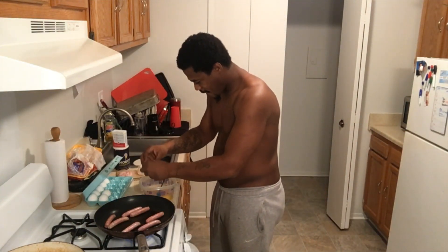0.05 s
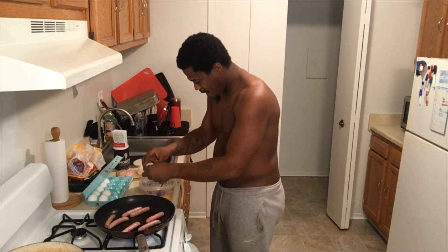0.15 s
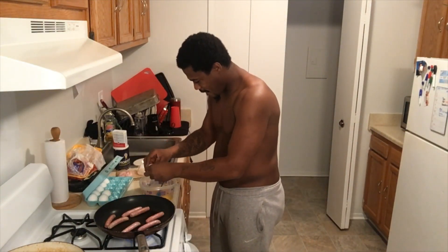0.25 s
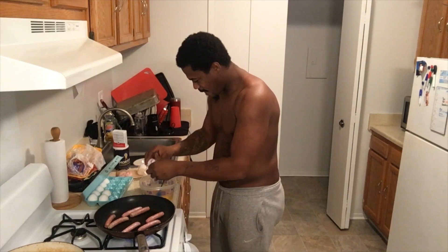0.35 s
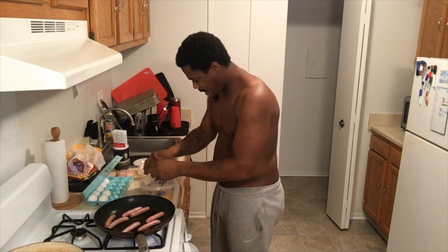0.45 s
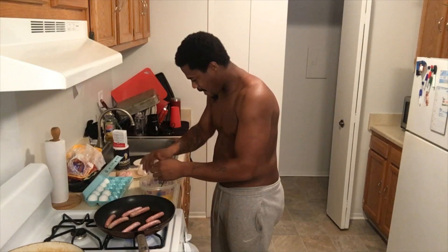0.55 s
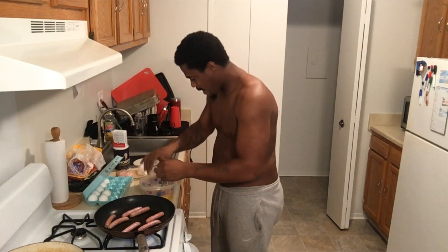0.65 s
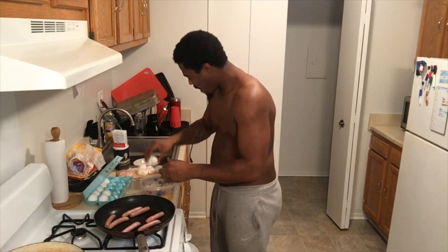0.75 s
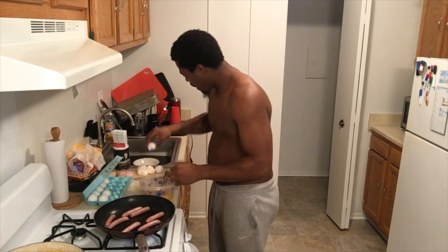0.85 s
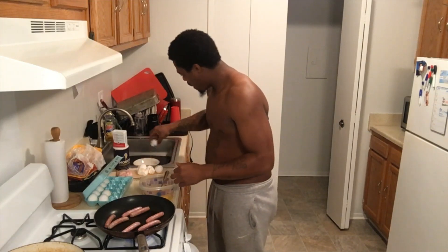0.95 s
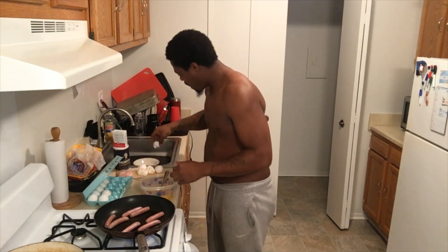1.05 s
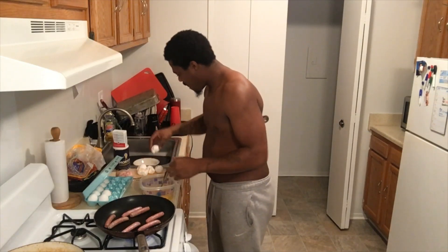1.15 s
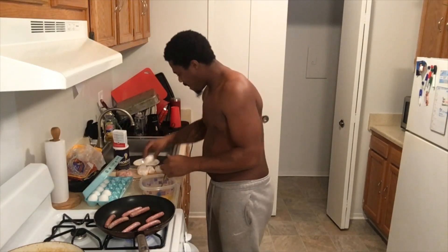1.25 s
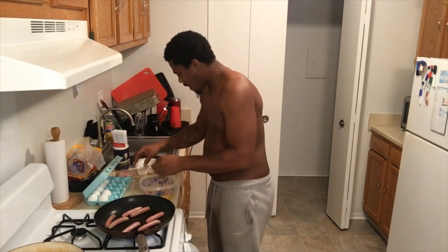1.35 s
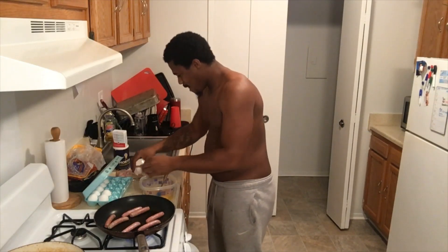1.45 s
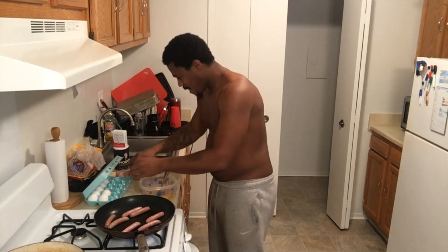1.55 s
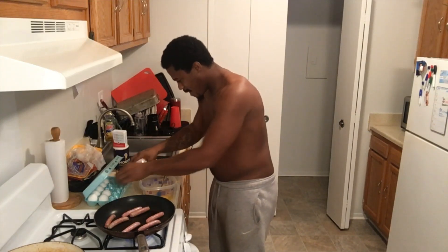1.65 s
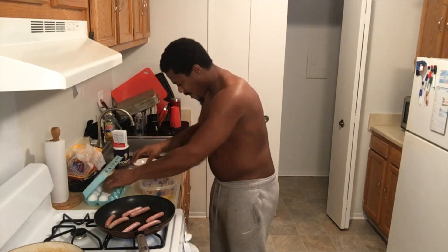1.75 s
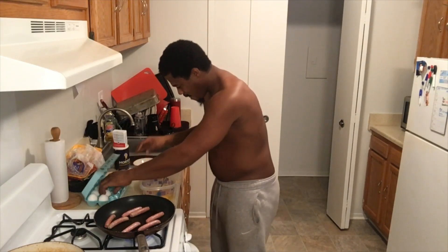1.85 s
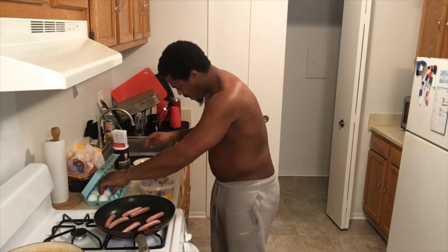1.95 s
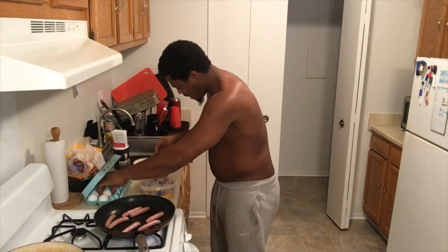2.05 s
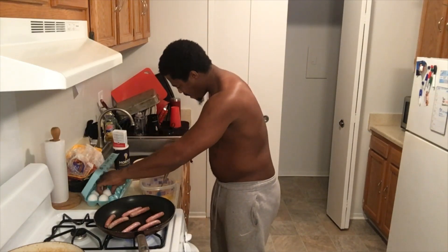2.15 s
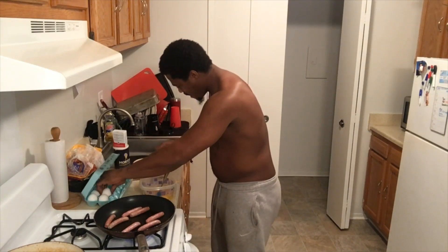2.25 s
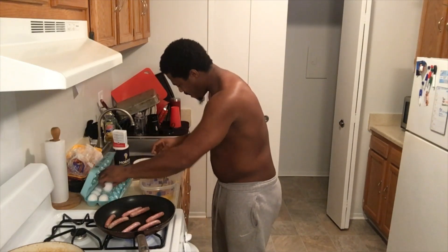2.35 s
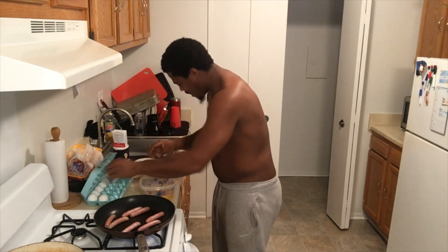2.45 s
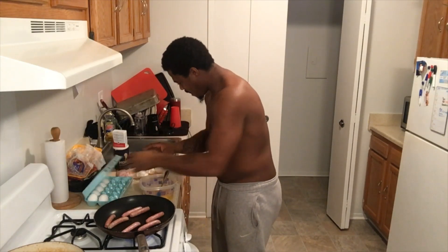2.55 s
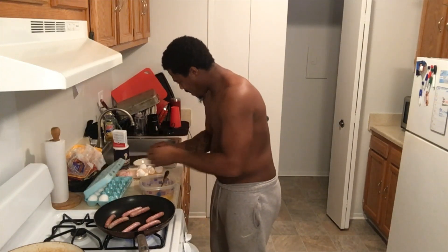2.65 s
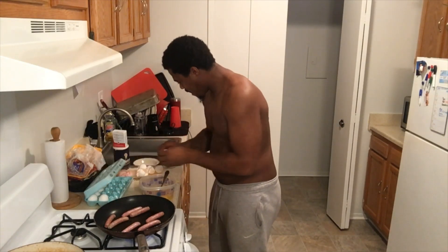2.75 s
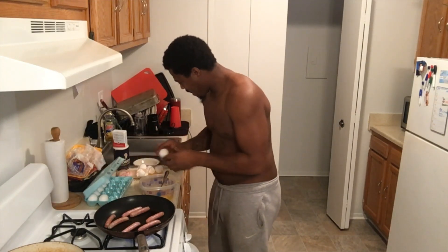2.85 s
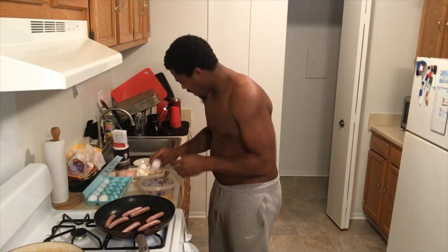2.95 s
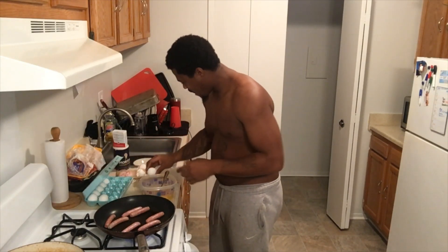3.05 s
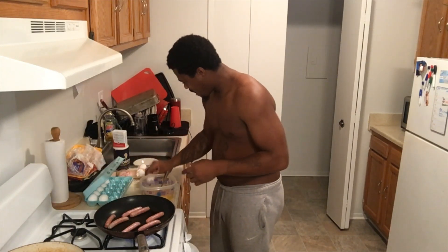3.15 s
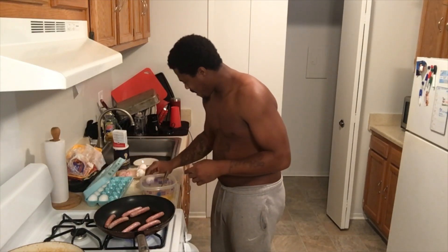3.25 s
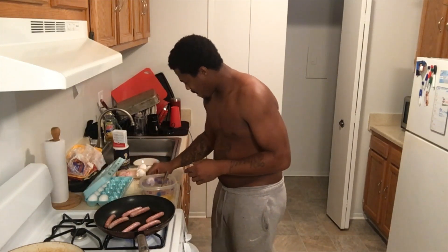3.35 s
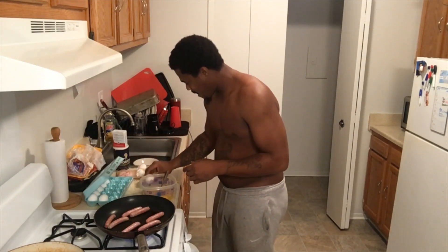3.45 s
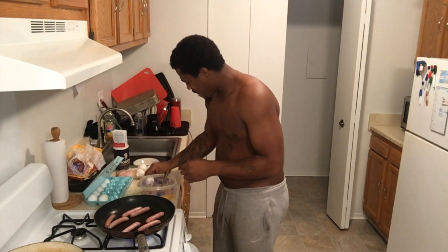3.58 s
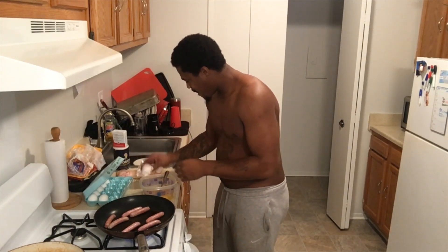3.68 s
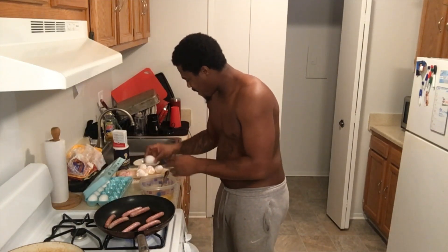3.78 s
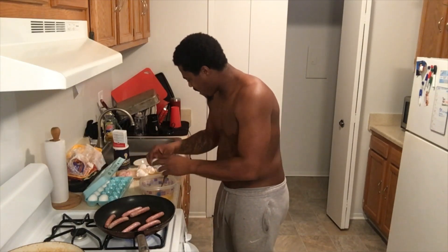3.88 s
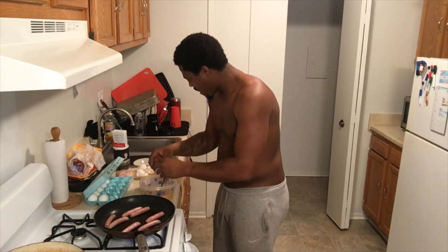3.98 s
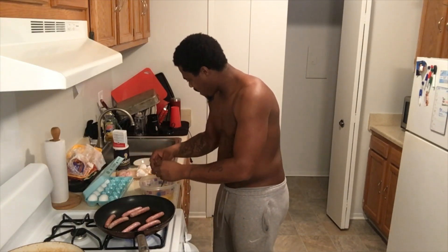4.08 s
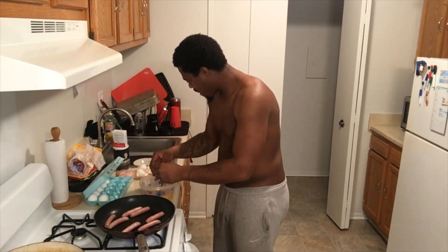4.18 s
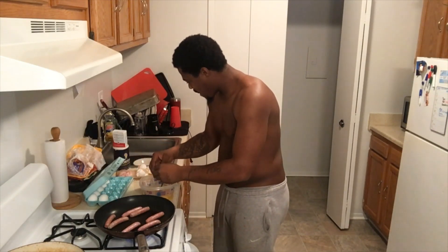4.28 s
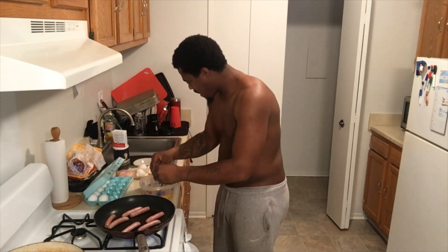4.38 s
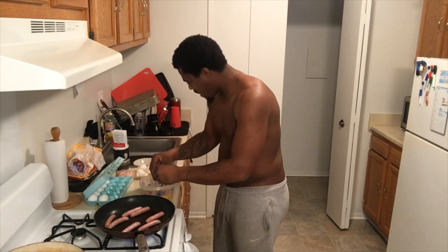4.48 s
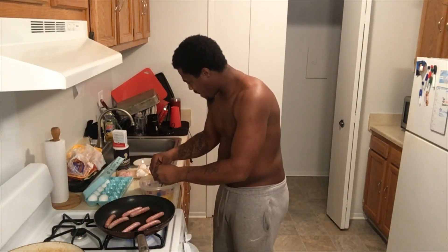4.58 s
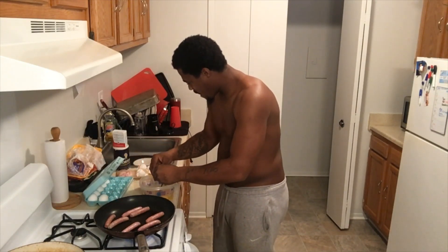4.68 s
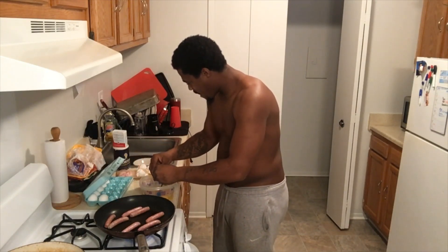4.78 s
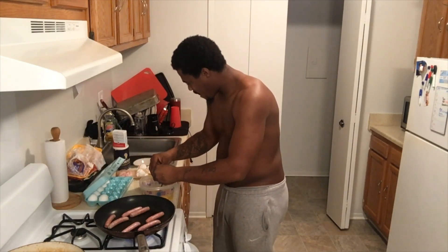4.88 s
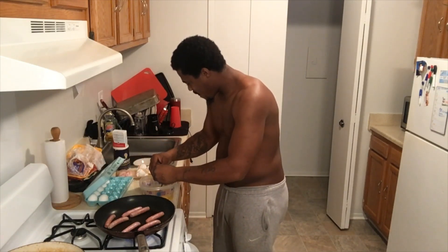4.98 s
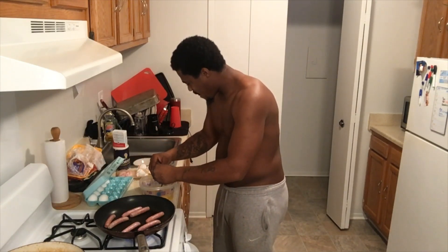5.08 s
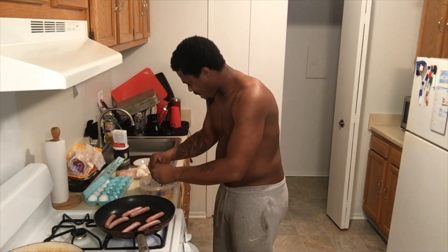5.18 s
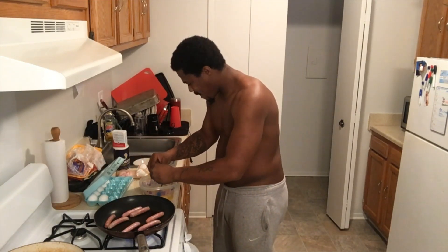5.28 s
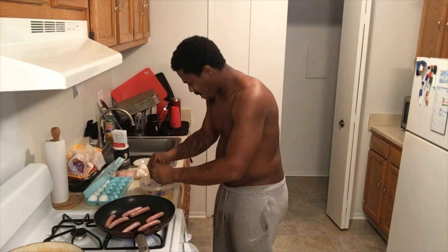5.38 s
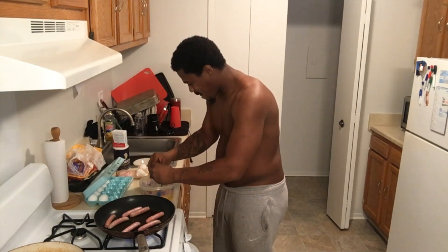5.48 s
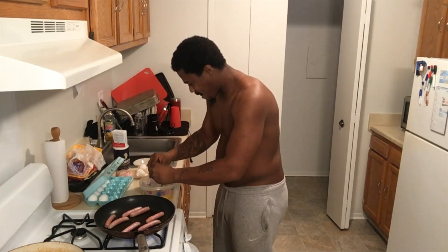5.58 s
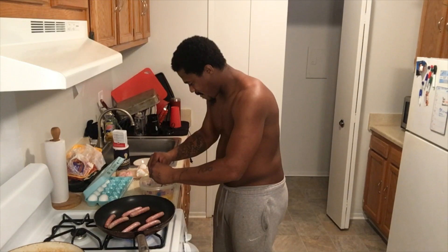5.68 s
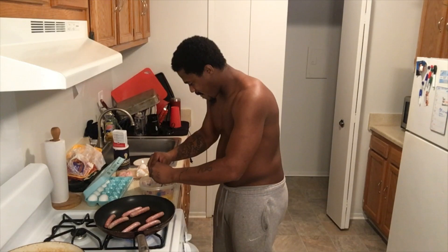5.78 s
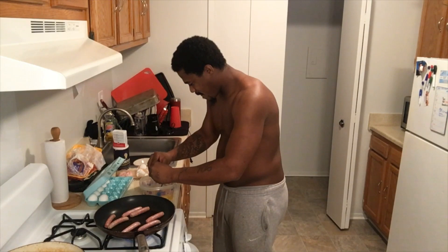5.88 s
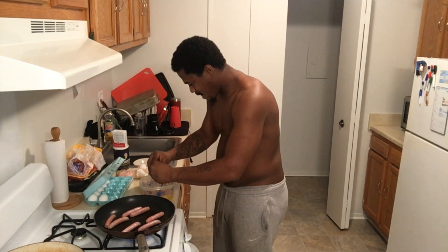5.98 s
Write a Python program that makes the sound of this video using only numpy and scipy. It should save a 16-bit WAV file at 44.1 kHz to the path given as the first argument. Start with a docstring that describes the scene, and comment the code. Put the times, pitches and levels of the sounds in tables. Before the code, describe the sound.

Steady soft frying underlies light egg handling at a counter. Small hollow shell clinks come first, the strongest a double touch as one shell lands on others. Fingers rub and squeak softly in a foam carton. Then come three quick rim knocks of falling strength, with a ringing bowl and low counter thud, followed by brittle snaps, a wet-less crackling tear and a last shell clink. Short bright room, muffled treble.

```python
"""Breaking eggs in a kitchen

Eggs are broken into a bowl on a counter while sausages sizzle quietly in a pan: dying modes ring the
struck bodies, filtered random impulses make cracks, rustle and sizzle, and noise makes the air. An empty
shell is nested and dropped on a pile of shells; a new egg is worked out of its foam carton, knocked three
times on the bowl's rim and pulled apart. The small hard kitchen rings; the microphone is dull."""
import sys
import numpy as np
from scipy import signal
from scipy.fft import rfft, irfft
from scipy.io import wavfile

SR = 44100
rng = np.random.default_rng(int(sys.argv[2]) if len(sys.argv) > 2 else 0)


def generate_wav(sig):
    """Save sig (samples, or channels by samples) to the path in sys.argv[1] as 16-bit PCM at SR."""
    pcm = np.round(np.clip(np.atleast_2d(sig).T, -1, 1) * 32767).astype(np.int16)
    wavfile.write(sys.argv[1], SR, pcm)


N = 265923  # samples
TIME = np.arange(N) / SR  # s, the whole scene
AGE = np.arange(SR * 3 // 4) / SR  # s, since the onset of a short sound

# Knocks of the egg on the rim. Each row: time in seconds, click level in dB, weight of its low mids in dB,
# ring after the knock in dB, counter thud in dB, ring of the dented shell in dB.
KNOCKS = [(3.2864, -22, 0.5, -23.5, -34.5, -39), (3.4700, -31.5, -1.5, -35.5, -33.5, -60),
          (3.6700, -35, -7, -44, -35, -30.5)]
# Spectrum of the click. Each row: frequency in Hz, relative level in dB.
CLICK_SPECTRUM = [(100, -19), (400, -4.5), (750, 2), (940, -5.5), (1090, 5), (1250, 2), (1480, -1.5),
                  (1900, 4), (2500, 0.5), (3200, -1.5), (4300, -1.5), (6500, -2), (14000, -14)]
# Modes heard after a knock: bowl, counter and room together.
# Each row: frequency in Hz, relative level in dB, T60 in seconds.
KNOCK_MODES = [(463, -17, .35), (604, -14, .45), (728, -8, .36), (854, -7, .36), (972, -9, .36),
               (1070, 0, .27), (1100, -1, .28), (1255, -10, .38), (1357, -8, .22), (1601, -13, .35),
               (1754, -8, .33), (1843, -9, .35), (1911, -7, .36), (2076, -10, .42), (2166, -7, .38),
               (2247, -11, .38), (2340, -8, .36), (2696, -7, .24), (2921, -8, .32)]
# Modes of the counter's thud. Each row: frequency in Hz, relative level in dB, T60 in seconds.
COUNTER_MODES = [(73.6, -18.5, 0.79), (119.5, -3.5, 0.26), (150.3, 4, 0.097), (211.9, -1, 0.2),
                 (257.2, -7.5, 0.15), (338.5, -14, 0.23)]
# Modes of the dented egg. Each row: frequency in Hz, relative level in dB, T60 in seconds.
DENT_MODES = [(2960, -6.5, 0.17), (3000, -2, 0.084), (3033, 6, .025), (2410, -7, 0.027)]
# The two halves tear apart. One row: time in seconds, level in dB, decay constant of the crackle in seconds.
OPENING = (5.016, -43.5, 0.0056)
# Modes of the emptying egg. Each row: frequency in Hz, relative level in dB, T60 in seconds.
EGG_MODES = [(676, -1.5, 0.012), (1300, -9, 0.023), (2500, -7, .008), (2750, -3, .008), (3540, 6, 0.0094),
             (4100, 19, 0.0065), (7500, -4, .001)]
# Thumbs splitting shell or prying an egg loose. Each row: time in seconds, snap level in dB,
# decay constant of the crackle in seconds, grit under the thumbs in dB before the room.
SNAPS = [(.641, -52, .012, -74), (1.445, -53.5, .005, -61), (1.862, -51, .008, -76),
         (2.081, -54, .004, -65), (3.7671, -42, .0037, -66), (3.9188, -50, .0017, -64),
         (4.4877, -49, .0021, -67), (4.5754, -52.5, .001, -67), (4.687, -54, .0038, -67),
         (4.993, -51, .012, -66), (5.012, -45, .0087, -60), (5.755, -48.5, .006, -57),
         (5.881, -45, .0089, -65)]
# Spectrum of a snap. Each row: frequency in Hz, relative level in dB.
SNAP_SPECTRUM = [(100, -33.5), (650, -11.5), (1000, -22), (1600, -10), (2400, 1), (3100, 2.5), (4200, -1.5),
                 (8000, -3.5), (14000, -12)]
# Spectrum of the grit. Each row: frequency in Hz, relative level in dB.
GRIT_SPECTRUM = [(500, -30.5), (1800, -14), (3000, 2.5), (4500, -0.5), (9000, 7), (14000, -3.5)]
PRESS_S, RELAX_S = .045, .075  # time constants: grit builds before a snap and dies away after it
# Empty half shells touching. Each row: time in seconds, level in dB, pitch of the hollow in Hz,
# brightness in dB, time for the rattle to fall 20 dB in seconds.
CLINKS = [(.038, -56.5, 1930, -7, .02), (.096, -55, 1330, -4, .015), (.191, -57.5, 1320, 3, .01),
          (.277, -42.5, 1370, -6, .07), (.311, -45.5, 1420, -2, .14), (.453, -44.5, 1400, 0, .03),
          (.936, -58.5, 1450, -4, .015), (1.124, -55.5, 1390, -9, .09), (1.525, -38.5, 1390, -1, .04),
          (1.533, -38.5, 2190, -4, .03), (1.616, -50, 1260, 6, .015), (5.889, -40, 1920, -3, .03)]
# Modes of the shell wall. Each row: frequency in Hz, relative level in dB, T60 in seconds.
SHELL_MODES = [(1160, -43.5, .025), (1800, 17.5, 0.019), (2100, 12, 0.026), (2780, 9, 0.06),
               (3640, 13, 0.02)]
HOLLOW_T60 = .016  # s
ROCK_S, ROCK_JITTER = .015, .15  # s between contacts of a rocking shell, and their scatter as a share of it
ROCK_DETUNE, ROCK_DULL_DB = .04, -2  # later contacts meet other spots (relative scatter) and are duller
# Strokes of the fingers in the foam carton. Each row: start in seconds, length in seconds,
# rustle in dB and low rubbing in dB, both before the room.
STROKES = [(1.858, .125, -61, -60.5), (2.02, .19, -59.5, -76), (2.215, .05, -57, -80),
           (2.265, .06, -57.5, -59), (2.35, .075, -57, -66)]
STROKE_ATTACK_S, STROKE_RELEASE_S = .01, .022  # linear rise, exponential time constant
# Spectrum of the rubbing. Each row: frequency in Hz, relative level in dB.
RUB_SPECTRUM = [(60, -20), (250, -9.5), (400, -2.5), (540, 4), (750, -9.5), (950, -3), (1300, -7),
                (2500, -14), (6000, -49)]
# Soft bumps of the carton on the counter. Each row: time in seconds, level in dB before the room.
BUMPS = [(1.696, -52.5), (1.737, -52), (1.766, -56), (1.873, -51.5)]
# Modes of the carton's soft walls. Each row: frequency in Hz, relative level in dB, T60 in seconds.
FLEX_MODES = [(55, -5.5, 0.27), (125, 0, 0.089), (160, 3, 0.095), (224, 2.5, 0.096), (288, -0.5, 0.049)]
# Spectrum of the frying pan. Each row: frequency in Hz, relative level in dB per Hz.
SIZZLE_SPECTRUM = [(300, -38), (800, -15), (1000, -19.5), (1300, -15.5), (1500, -17.5), (2000, -5.5),
                   (2700, 0.5), (3200, -1), (5000, 1), (8000, 5), (14000, -2.5)]
# Spectrum of the low murmur of the kitchen air. Each row: frequency in Hz, relative level in dB per Hz.
AIR_SPECTRUM = [(15, -21), (28, -8), (42, 4.5), (100, -4), (170, -12), (260, -3.5), (350, -7.5), (550, -11),
                (800, -21), (1500, -16), (5000, -49.5)]
# Partials of the refrigerator. Each row: frequency in Hz, peak level in dB.
HUM = [(119, -77), (242, -74)]
# Reflections off counter, hood and walls. Each row: delay in seconds, relative gain.
ECHOES = [(.0031, 1), (.0047, 0.0018), (.0078, 0.51), (.0104, 0.41), (.0165, -0.35), (.0322, 0.12)]
# Reverberation of the kitchen. Each row: frequency in Hz, T60 in seconds.
ROOM = [(100, 0.4), (400, 0.61), (1200, 0.46), (2500, 0.46), (8000, 0.29)]
# Response of the microphone. Each row: frequency in Hz, gain in dB.
MIC = [(3000, 2), (3500, -7), (4000, -16), (4700, -24), (5800, -30), (8000, -25), (9200, -29),
       (10500, -37.5), (15000, -49)]
EDGE_HZ = 15300  # band limit


def amp(db):
    """Decibel law: level to amplitude gain."""
    return 10 ** (np.asarray(db) / 20)


def read(points, hz):
    """Interpolation of a table's values on a log-frequency axis."""
    f, value = np.transpose(points)
    return np.interp(np.log(hz + 1), np.log(f), value)


def colour(x, spectrum, size=4096):
    """Minimum-phase filtering: the log spectrum's Hilbert transform gives the phase of a causal response."""
    log_gain = np.log(amp(read(spectrum, abs(np.fft.fftfreq(size, 1 / SR)))))
    response = np.exp(np.conj(signal.hilbert(log_gain)))
    taps = np.fft.ifft(response).real
    return signal.oaconvolve(x, taps[:size // 2])[:len(x)]


def steady(x):
    """Power normalisation: a lasting sound is scaled to rms 1 as the microphone hears it."""
    return x / np.std(colour(x, MIC))


def brief(x):
    """Energy normalisation: a short sound is scaled to the heard energy of 10 ms at rms 1."""
    return x / np.sqrt(np.sum(colour(x, MIC) ** 2) * 100 / SR)


def add(mix, s, sound):
    """Superposition: mixes a sound in place at time s."""
    part = mix[max(round(s * SR), 0):][:len(sound)]
    part += sound[:len(part)]


def ring(modes, stretch=1):
    """Modal decay: a struck body is a sum of exponentially dying sines."""
    return sum(amp(db - 60 * AGE / t60) * np.sin(2 * np.pi * hz * stretch * AGE) for hz, db, t60 in modes)


def swelling(modes, rise):
    """Gradual excitation: modes build up softly after a push."""
    return ring(modes) * (1 - np.exp(-AGE / rise))


def grains(size, per_s, spread_db):
    """Random impulse process: tiny fractures or bursts at random moments, a few of them large."""
    sizes = amp(spread_db * np.minimum(rng.exponential(1, size), 4))
    signs = rng.choice([-1, 1], size)
    return sizes * signs * (rng.random(size) < per_s / SR)


def crackle(length):
    """Brittle fracture: a crack gives one snap and a dying spray of smaller ones."""
    spray = grains(len(AGE), per_s=5000, spread_db=6) * np.exp(-AGE / length)
    spray[0] += 3
    return spray


def kitchen(x, echo_share, wet_db):
    """Room acoustics: direct sound, echoes off near surfaces and a diffuse tail drawn anew at each call."""
    hz, t, z = signal.stft(rng.standard_normal(len(AGE)), SR, nperseg=256)
    decaying = z * amp(-60 * t / read(ROOM, hz)[:, None])
    tail = signal.istft(decaying, SR, nperseg=256)[1][:len(AGE)]
    tail *= 1 - np.exp(-AGE / 0.0017)  # the diffuse field takes time to build
    response = amp(wet_db) * tail / np.linalg.norm(tail)
    response[0] += 1
    for delay, gain in ECHOES:
        add(response, delay, np.array([gain * echo_share]))
    return signal.fftconvolve(x, response)[:len(x)]


def disperse(x, delay):
    """Dispersion: bending waves cross the bowl faster when higher, smearing a click; delay is that of 1 kHz."""
    khz = np.fft.rfftfreq(len(x), 1 / SR) / 1000
    phase = np.exp(-4000j * np.pi * delay * np.sqrt(khz))
    return irfft(rfft(x) * phase, len(x))


def knocks():
    """Impact excitation: the egg clicks on the rim, bowl, counter and room ring together, the counter booms;
    the shell dents and rings, most strongly at the third knock."""
    out = np.zeros(N)
    for s, click_db, weight_db, ring_db, thud_db, dent_db in KNOCKS:
        # an intact egg pushes harder and longer than a cracked one
        push = [(300, 0), (800, weight_db), (1500, weight_db), (2300, 0)]  # (Hz, dB)
        blow = colour(signal.unit_impulse(len(AGE)), push)
        click = disperse(colour(blow, CLICK_SPECTRUM), delay=0.002008)
        # the shell fractures for a few milliseconds under the blow
        fracture = signal.fftconvolve(click, crackle(length=0.007))[:len(AGE)]
        crack = brief(kitchen(click, echo_share=1.25, wet_db=11)) + amp(-6.5) * brief(fracture)
        add(out, s - .001, amp(click_db) * brief(crack))

        after_ring = sum(rng.choice([-1, 1]) * swelling([mode], rise=0.0023) for mode in KNOCK_MODES)
        add(out, s, amp(ring_db) * brief(after_ring))

        thud = kitchen(swelling(COUNTER_MODES, rise=0.0034), echo_share=0.11, wet_db=-7.5)
        add(out, s + 0.0067, amp(thud_db) * brief(thud))

        dent_ring = brief(swelling(DENT_MODES, rise=0.0017))
        dent = dent_ring + amp(-2) * brief(colour(crackle(length=.005), SNAP_SPECTRUM))
        add(out, s + 0.0056, amp(dent_db) * brief(kitchen(dent, echo_share=.1, wet_db=-4)))
    return out


def opening():
    """Fracture-driven resonance: the last of the shell tears and rings the emptying egg."""
    s, db, length = OPENING
    out = np.zeros(N)
    tear = signal.fftconvolve(crackle(length), ring(EGG_MODES))[:len(AGE)]
    tear = signal.sosfilt(signal.butter(3, 480, "high", fs=SR, output="sos"), tear)
    add(out, s, amp(db) * brief(kitchen(tear, echo_share=0.18, wet_db=-4.5)))
    return out


def snaps():
    """Brittle fracture: dry crackles as thumbs split shell or pry an egg loose."""
    out = np.zeros(N)
    for s, db, length, _ in SNAPS:
        snap = colour(crackle(length), SNAP_SPECTRUM)
        add(out, s, amp(db) * brief(kitchen(snap, echo_share=0.48, wet_db=-2.0)))
    return out


def fingers():
    """Granular friction: faint grit swells as thumbs press towards each snap, and fades as they relax."""
    pressure = np.zeros(N)
    for s, _, _, db in SNAPS:
        pressure += amp(db) * np.exp(-np.maximum((s - TIME) / PRESS_S, (TIME - s) / RELAX_S))
    grit = steady(colour(grains(N, per_s=900, spread_db=3), GRIT_SPECTRUM))
    return kitchen(grit * pressure, echo_share=0.25, wet_db=-5.5)


def clink(hz, bright_db):
    """Coupled resonance: a contact rings a half shell's hollow and its wall; broken edges scratch."""
    hollow = brief(ring([(hz, 0, HOLLOW_T60)]))
    wall = brief(ring(SHELL_MODES, stretch=1 + 0.033 * rng.standard_normal()))
    scratch = brief(colour(crackle(length=0.0067), SNAP_SPECTRUM))
    sound = hollow + amp(bright_db) * (wall + amp(-2) * scratch)
    # so small a body radiates little below its hollow's pitch
    sound = signal.sosfilt(signal.butter(6, .76 * hz, "high", fs=SR, output="sos"), sound)
    return brief(kitchen(sound, echo_share=0.18, wet_db=-0.1))


def clinks(count=5):
    """Repeated impact with loss: ever weaker contacts follow each touch as the shell rocks to rest."""
    out = np.zeros(N)
    for s, db, hz, bright_db, rattle_s in CLINKS:
        add(out, s, amp(db) * clink(hz, bright_db))
        for k, (late, spot) in enumerate(rng.standard_normal((count, 2)), 1):
            age = ROCK_S * (k + ROCK_JITTER * late)
            contact = clink(hz * (1 + ROCK_DETUNE * spot), bright_db + ROCK_DULL_DB)
            add(out, s + age, amp(db - 20 * age / rattle_s) * contact)
    return out


def stroke(start, length):
    """Sliding envelope: a finger takes hold, slides and lets go."""
    hold = np.clip((TIME - start) / STROKE_ATTACK_S, 0, 1)
    return hold * np.exp(-np.maximum(TIME - start - length, 0) / STROKE_RELEASE_S)


def carton():
    """Friction and soft impact: foam rustles and rubs under each finger stroke and bumps the counter."""
    soft = [(3500, 0), (5500, -6)]  # foam has less treble than shell: (Hz, dB)
    rustle = steady(colour(colour(grains(N, per_s=1500, spread_db=4), SNAP_SPECTRUM), soft))
    rub = steady(colour(grains(N, per_s=2100, spread_db=3), RUB_SPECTRUM))
    out = np.zeros(N)
    for start, length, rustle_db, rub_db in STROKES:
        out += stroke(start, length) * (amp(rustle_db) * rustle + amp(rub_db) * rub)
    for start, db in BUMPS:
        add(out, start, amp(db) * brief(swelling(FLEX_MODES, rise=0.0096)))
    return kitchen(out, echo_share=0.38, wet_db=-5.5)


def sizzle(swell):
    """Random impulse noise: countless bursts of fat in the pan, their level wandering slightly."""
    fat = kitchen(grains(N, per_s=2700, spread_db=4.5), echo_share=0.26, wet_db=1.0)
    return amp(-61.6 + .3 * swell) * steady(colour(fat, SIZZLE_SPECTRUM))


def air():
    """Broadband noise: the low murmur of the room air."""
    return amp(-66.5) * steady(colour(rng.standard_normal(N), AIR_SPECTRUM))


def hum(swell):
    """Phase modulation: the refrigerator's sines waver by 1.3 rad per unit of swell."""
    return sum(amp(db) * np.sin(2 * np.pi * hz * TIME + 1.3 * swell) for hz, db in HUM)


def background():
    """Superposition of steady sources: one slow random curve moves both sizzle level and hum phase."""
    swell = np.interp(TIME, np.linspace(0, TIME[-1], num=40), rng.standard_normal(size=40))
    return sizzle(swell) + air() + hum(swell)


def scene():
    """Superposition: the pressures of all sources add at one microphone."""
    egg = knocks() + opening() + snaps() + fingers()
    return (egg + clinks() + carton() + background())[None]


def record(dry):
    """Linear transduction: a muffled microphone without deep bass, its faint hiss, and the band limit."""
    heard = signal.sosfilt(signal.butter(2, 30, "high", fs=SR, output="sos"), dry[0])
    heard = colour(heard, MIC) + amp(-88.0) * rng.standard_normal(N)
    band_limit = signal.firwin(511, EDGE_HZ, window=("kaiser", 9), fs=SR)
    return signal.oaconvolve(heard, band_limit, "same")[None]


dry = scene()
out = record(dry)
generate_wav(out)
```